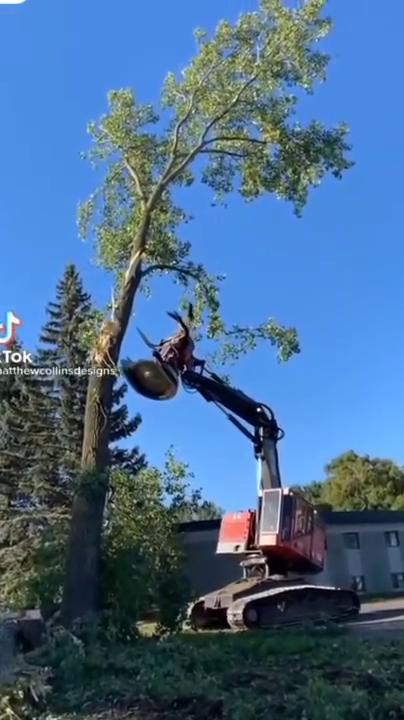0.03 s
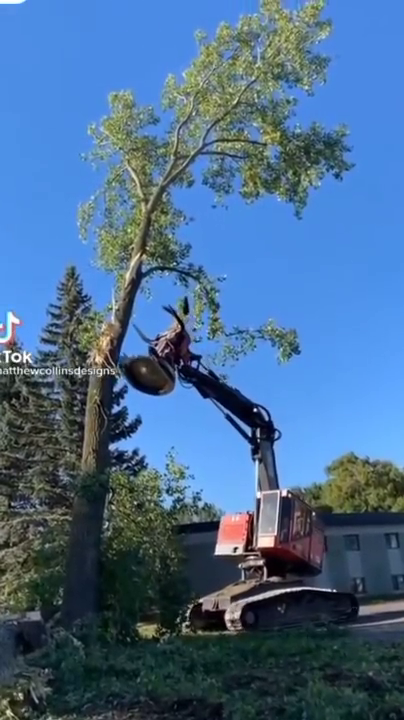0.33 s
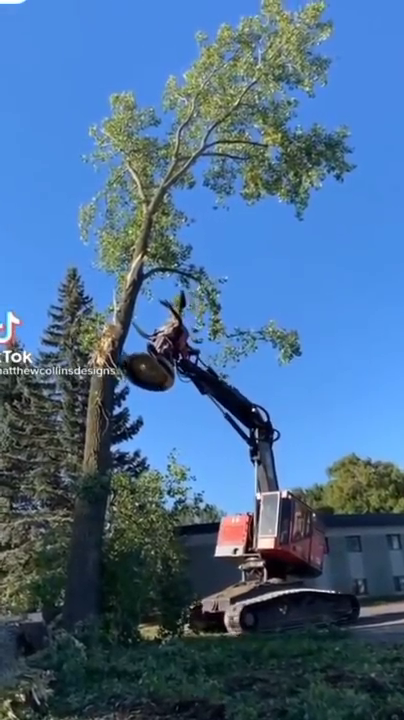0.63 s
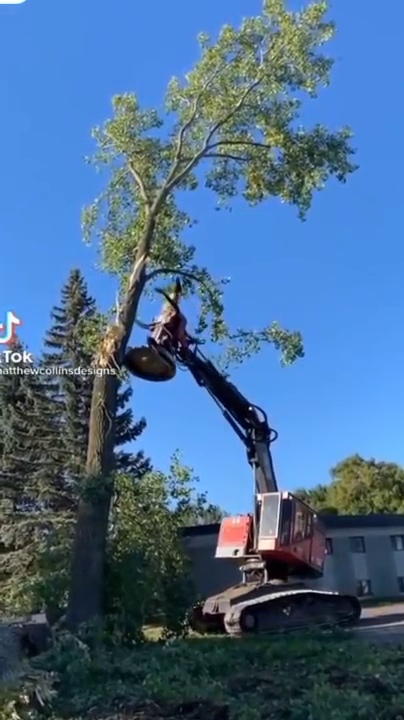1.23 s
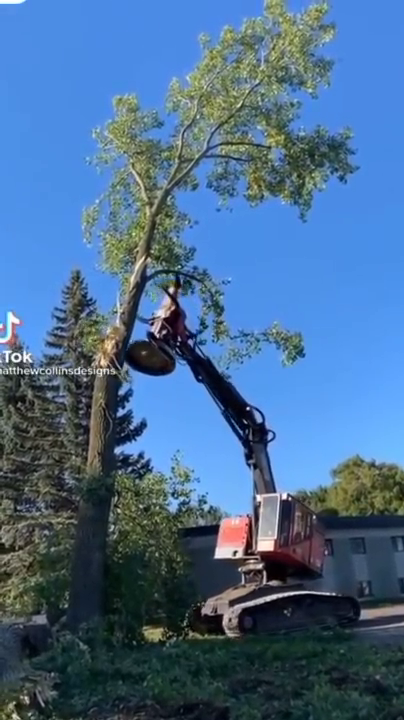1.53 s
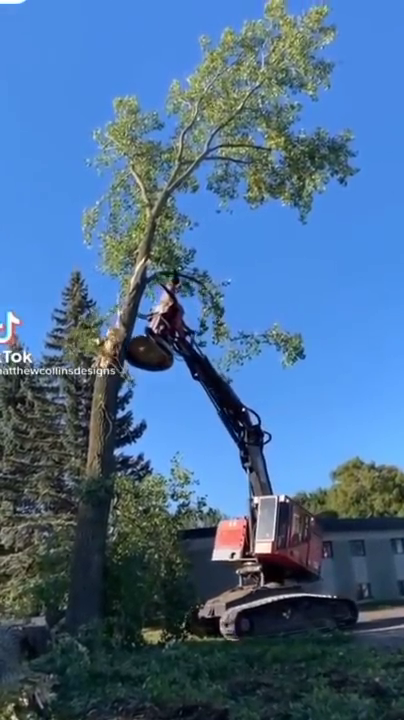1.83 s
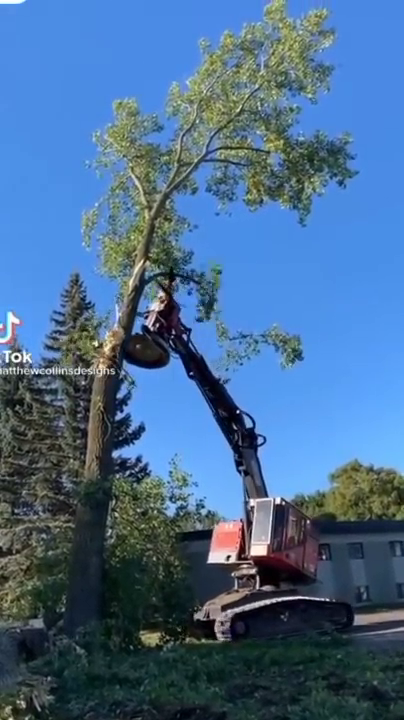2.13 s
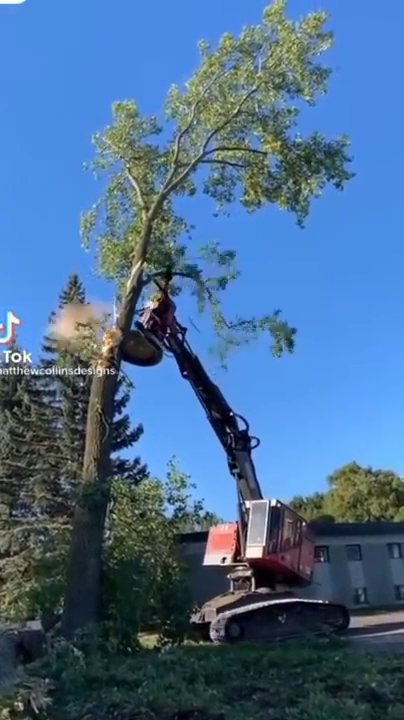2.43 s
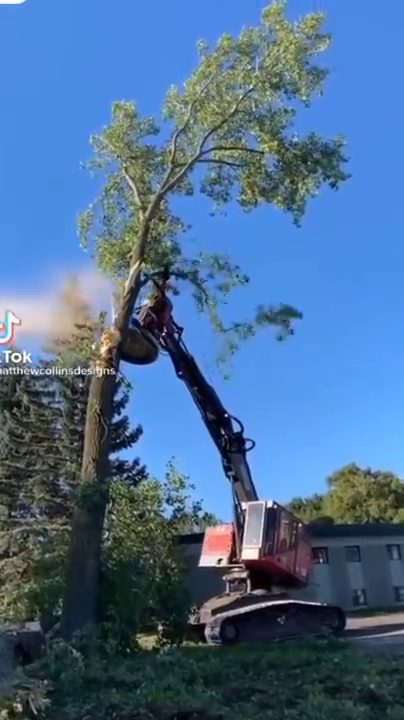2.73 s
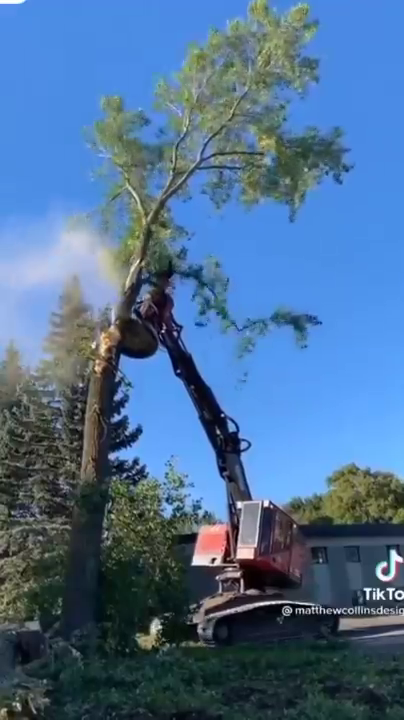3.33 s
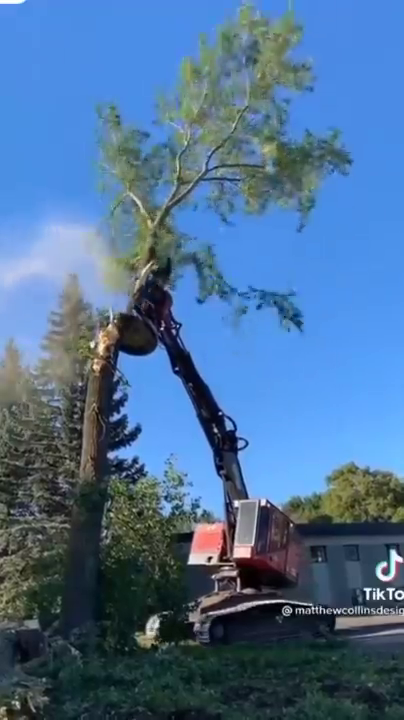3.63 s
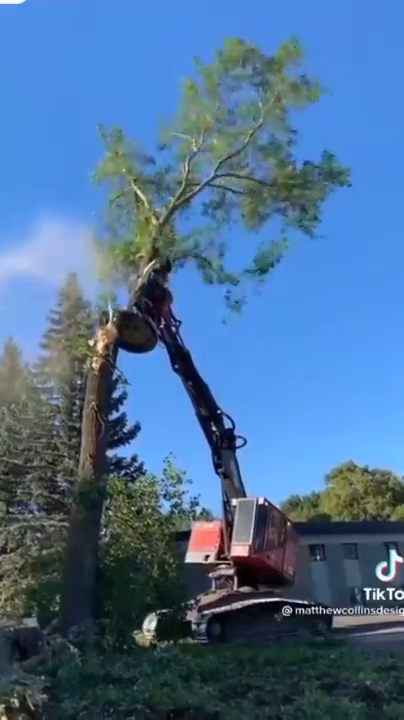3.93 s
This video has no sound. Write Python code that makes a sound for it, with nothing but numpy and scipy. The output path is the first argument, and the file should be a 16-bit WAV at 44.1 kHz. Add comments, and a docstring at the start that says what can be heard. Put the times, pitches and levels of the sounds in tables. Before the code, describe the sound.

A large saw disc whines and whirs over a tree cutter's diesel drone. It bites into a trunk with a loud rasp, slowing as it cuts, and the wood snaps. Heard nearby outdoors, with little echo.

```python
"""A yard among trees and walls, one microphone near enough to a tracked tree cutter to catch little echo.
Its diesel drones behind a free-spinning saw disc that whines and stirs the air.
The disc bites into the trunk, rasps through it tooth by tooth and loses speed, then rubs in the cut.
The last wood snaps in a short crackling burst, and the engine sags under load."""
import sys
import numpy as np
from scipy import signal
from scipy.fft import rfft, irfft
from scipy.io import wavfile
from scipy.ndimage import map_coordinates

SR = 44100
rng = np.random.default_rng(int(sys.argv[2]) if len(sys.argv) > 2 else 0)


def digitize_waveform(pressure):
    """Quantize a signal to 16-bit integers and store it at the path in sys.argv[1].

    Rows of a 2-D input are taken as channels; values are limited to [-1, 1].
    """
    field = np.atleast_2d(pressure).T
    bounded = np.clip(field, -1, 1)
    quanta = np.round(bounded * 32767).astype(np.int16)
    wavfile.write(sys.argv[1], SR, quanta)


N = 176400
T = np.arange(N) / SR
FREQS = np.arange(N // 2 + 1) * SR / N

# The disc's way through the trunk (time [s], rasp [dB], sawdust hiss [dB], tooth knocks [dB])
CUT_LEVELS = [(2.3, -100, -100, -70), (2.455, -56, -62, -45), (2.5, -35, -39, -44), (2.57, -34.5, -34, -42),
              (2.635, -29.5, -29.5, -40), (2.72, -35.5, -30, -35.5), (2.78, -32.5, -30, -39),
              (2.81, -29.5, -25.5, -38), (2.86, -32, -30, -37.5), (2.905, -28.5, -30, -34),
              (2.94, -31, -29.5, -36), (3.08, -31, -32, -33), (3.145, -26.5, -32, -32.5),
              (3.195, -34, -37, -34), (3.24, -36, -36, -35), (3.275, -52, -47, -40), (3.31, -60, -52, -37),
              (3.37, -57, -56, -40), (3.41, -50, -48, -35.5), (3.455, -52, -52, -40.5),
              (3.48, -54, -50, -37), (3.53, -56, -50, -40), (3.6, -58, -54, -48), (3.7, -80, -75, -60)]


def undb(db):
    """Decibels to gain."""
    return 10 ** (np.asarray(db) / 20)


def unit(x):
    """Scale to rms 1."""
    return x / np.sqrt(np.mean(x ** 2))


def curve(table, column=1):
    """One column of a table, joined by straight lines in time."""
    rows = np.array(table, float)
    return np.interp(T, rows[:, 0], rows[:, column])


def colour(x, points):
    """Filter by (frequency [Hz], relative level [dB]) points; rms 1."""
    hz, db = np.array(points, float).T
    gain = undb(np.interp(np.log(np.maximum(FREQS, 1)), np.log(hz), db))
    return unit(irfft(rfft(x) * gain, N))


def drift(rate_hz):
    """Smooth random drift with spread 1."""
    lowpass = np.exp(-(FREQS / rate_hz) ** 2) * (FREQS > 0)
    return unit(irfft(rfft(rng.standard_normal(N)) * lowpass, N))


def patchy(x, depth_db, width_hz=170, rate_hz=12, top_hz=15350):
    """Narrow bands swell and fade on their own; rms 1."""
    spectrum = rfft(x)
    bands = (irfft(spectrum * np.maximum(1 - abs(FREQS / width_hz - k), 0), N)
             for k in range(int(top_hz / width_hz) + 1))
    return unit(sum(band * undb(depth_db * drift(rate_hz)) for band in bands))


def load(full_bite_db=-31):
    """How hard the teeth bite, from 0 (spinning free) to 1."""
    return np.minimum(undb(curve(CUT_LEVELS) - full_bite_db), 1)


def fibres(snaps_per_s=1800, snap_share=.6):
    """Wood fibres giving way: dense snaps over a hiss."""
    snaps = (rng.random(N) < snaps_per_s / SR) * rng.choice([-1, 1], N)
    return np.sqrt(snap_share) * unit(snaps) + np.sqrt(1 - snap_share) * rng.standard_normal(N)


def yard(direct, echo_db=-19, t60_s=.3):
    """Faint, dull scatter from trees and walls follows the direct sound to the microphone."""
    tail = colour(rng.standard_normal(N), [(1000, 16), (10000, -24)]) * undb(-60 * T / t60_s)
    return direct + undb(echo_db) * signal.fftconvolve(direct, tail / np.linalg.norm(tail))[:N]


def engine(cylinders=6, waver_db=1.5):
    """The diesel's cylinders fire in turn; their unevenness adds orders around the firing note."""
    # Firing note, sagging under load (time [s], firing rate [Hz], level [dB])
    firing = [(0, 89.4, -46), (2.6, 90.54, -47), (2.78, 89.5, -45.5), (2.95, 92.1, -50), (3.2, 90.6, -45.5),
              (3.35, 82.5, -41.5), (3.48, 74.6, -44), (3.6, 73.6, -34), (3.71, 70.6, -41.5),
              (3.85, 73.6, -35), (4, 73.65, -37)]
    # Exhaust orders (multiple of the engine cycle, relative level [dB])
    orders = [(6, 0.5), (8, -15), (12, -9), (15, -8.5), (24, -14.5)]
    cycles = np.cumsum(curve(firing)) / SR / cylinders
    drone = sum(undb(db + waver_db * drift(10)) * np.sin(2 * np.pi * (k * cycles + rng.random()))
                for k, db in orders)
    return np.sqrt(2) * drone * undb(curve(firing, 2))


def rush(speed, air_db=-37.5, roar_db=-31):
    """Stirred air and a hollow roar; both sink as the disc slows from full speed (1)."""
    # Air and machinery (frequency [Hz], relative level [dB])
    air_spectrum = [(30, -16), (60, 2), (300, -12.5), (355, 1), (390, -3.5), (480, 0), (620, 2), (760, -3),
                    (900, -11.5), (1000, -1.5), (1150, -8), (1400, -10), (1600, -9), (2000, -13.5),
                    (2450, -16.5), (2600, -12.5), (3100, -17.5), (4000, -20), (5500, -23.5), (7200, -20),
                    (8200, -30), (10000, -25.5), (11800, -26), (12400, -82), (14200, -35), (14800, -70)]
    # The machine's roar at full speed (frequency [Hz], relative level [dB])
    roar_spectrum = [(25, -53), (42, -41), (62, -22.5), (80, -22), (108, -25), (150, -18.5), (178, -8),
                     (200, 3), (226, -4.5), (262, -5), (300, -13.5), (350, -41.5), (600, -76)]
    air = colour(rng.standard_normal(N), air_spectrum) * undb(air_db + .5 * drift(3.5))
    roar = colour(rng.standard_normal(N), roar_spectrum)
    roar = map_coordinates(roar, [np.cumsum(speed ** .5)], order=1, mode="mirror")  # pitch sinks too
    return air * speed ** 2.1 + roar * undb(roar_db) * speed ** 1.95


def disc_ring(width_hz=24, idle_db=-61, against_rasp_db=-7):
    """The steel disc sings faintly while it spins free, and loudly while it rasps through wood."""
    # Ringing modes of the disc (frequency [Hz], relative level [dB])
    modes = [(1010, -6), (1620, -3), (2580, -8), (2838, 0), (3030, 0), (3340, -2), (3485, -1), (3610, -5),
             (7280, -5)]
    response = sum(undb(db) / (1 + 2j * (FREQS - hz) / width_hz) for hz, db in modes)
    drive = rng.standard_normal(N) * (undb(idle_db) + undb(against_rasp_db + curve(CUT_LEVELS)))
    return irfft(rfft(drive) * response / np.sqrt(np.mean(abs(response) ** 2)), N)


def whine(teeth, speed, shudder_cycles=.02, shudder_db=1.3, shudder_hz=40):
    """The tooth-passing tone with its wavering overtones; it shudders under load."""
    # Whine at the microphone (time [s], fundamental [dB], octave [dB])
    levels = [(0, -33.5, -33.5), (.5, -32.5, -35.5), (.98, -32, -35.5), (1.13, -32, -41.5),
              (1.43, -31.5, -43), (1.52, -32.5, -39.5), (1.7, -33.5, -39), (2.1, -33, -34),
              (2.45, -35.5, -32.5), (2.54, -39, -35.5), (2.6, -37, -30.5), (2.68, -40, -28),
              (2.75, -36.5, -29.5), (2.8, -33.5, -47), (2.84, -30, -44), (2.885, -34.5, -31),
              (2.97, -37, -30.5), (3.01, -34.5, -41), (3.045, -31, -31), (3.1, -28, -25.5),
              (3.15, -24.5, -30), (3.22, -31, -25.5), (3.25, -36, -39), (3.32, -29, -40.5),
              (3.39, -35.5, -48), (3.42, -34, -34.5), (3.49, -35, -35.5), (3.56, -32.5, -35),
              (3.68, -40, -51), (4, -37.5, -44)]
    # Overtones at full speed (multiple of the tooth rate, level [dB])
    overtones = [(3, -59.5), (4, -57.5), (5, -56), (6, -64)]
    phase = teeth + shudder_cycles * load() * drift(shudder_hz)
    tone = lambda k: np.sqrt(2) * np.sin(2 * np.pi * (k * phase + rng.random()))
    waver_db = lambda: .8 * drift(48) + shudder_db * load() * drift(shudder_hz)
    low = sum(tone(k) * undb(curve(levels, k) + waver_db()) for k in (1, 2))
    high = sum(tone(k) * undb(db + 6.5 * drift(3.1)) for k, db in overtones)
    return low + high * speed ** 2


def cut(teeth, rub_jitter_cycles=.007, bite_jitter_cycles=.016, scatter_db=2.1, likeness=.45):
    """Each tooth knocks the wood and tears out a puff of fibres; mere rubbing buzzes more evenly."""
    # Disc and trunk struck by the teeth (frequency [Hz], relative level [dB])
    knock_spectrum = [(300, -40), (560, -16), (750, -5), (890, -17), (1030, 0), (1280, -5), (1560, -1.5),
                      (1800, -6), (2050, -5), (2350, -13), (2570, -14), (2820, -10), (3090, -16),
                      (3350, -11), (3850, -17), (6000, -23), (11000, -34), (13000, -60)]
    # Tearing fibres (frequency [Hz], relative level [dB])
    rasp_spectrum = [(50, -20), (130, 12), (300, 1), (600, 0), (900, -10), (1300, -11), (1620, -1.5),
                     (1850, -2), (2450, -3), (2900, 2.5), (3200, 3), (3500, 3), (4300, -3.5), (5200, -39),
                     (9000, -67)]
    # Hiss of flying sawdust (frequency [Hz], relative level [dB])
    sawdust_spectrum = [(2500, -64), (4300, -14), (5300, -4), (6400, 2), (7350, 3), (8000, -4),
                        (9500, -7.5), (10500, 2), (11800, -7), (12300, -14), (15000, -33)]
    phase = teeth + (rub_jitter_cycles + bite_jitter_cycles * load()) * drift(150) + 1
    tooth = np.floor(phase).astype(int)
    bite = undb(scatter_db * load() * rng.standard_normal(N // 100)[tooth])  # one strength per tooth
    strikes = np.diff(tooth, prepend=tooth[0]) * bite
    knocks = colour(patchy(strikes, depth_db=3.2), knock_spectrum) * undb(curve(CUT_LEVELS, 3))
    puffs = fibres() * np.exp(.5 * np.cos(2 * np.pi * phase)) * bite * undb(.8 * drift(20))
    # Each puff partly repeats those of the three teeth before it.
    puffs = sum(likeness ** k * np.interp(teeth - k, teeth, puffs) for k in range(4))
    puffs = patchy(puffs, depth_db=2.8)
    rasp = colour(puffs, rasp_spectrum) * undb(curve(CUT_LEVELS))
    sawdust = colour(puffs, sawdust_spectrum) * undb(curve(CUT_LEVELS, 2))
    return rasp + sawdust + knocks


def burst(at_s, rise_s, decay_s):
    """Exponential rise and fall around a moment."""
    return np.exp(-np.maximum((at_s - T) / rise_s, (T - at_s) / decay_s))


def cracks(body_below_hz=4300, thud_db=-31):
    """Twigs tick thinly, thicker splinters break with more body and the trunk parts with a thud."""
    # Wood breaking (time [s], level [dB], rise [s], decay [s], body gain [dB])
    breaks = [(1.78, -40, .001, .005, -12), (2.158, -35.5, .0012, .003, -10), (2.2, -46, .025, .017, -10),
              (2.227, -31.5, .00056, .0029, -10), (2.632, -31, .004, .009, -1),
              (2.898, -20, .00083, .0018, 0), (2.909, -21.5, .001, .0036, 0), (3.539, -30, .0004, .0015, 0),
              (3.547, -28, .003, .006, -2), (3.5588, -16, .002, .004, 1.5), (3.563, -20.5, .0006, .005, 0),
              (3.571, -29, .001, .004, -2)]
    # Snapping wood (frequency [Hz], relative level [dB])
    snap_spectrum = [(50, -20), (150, -7), (500, 8), (1300, 9), (2200, 9), (3000, 13), (4000, 7), (6000, 7),
                     (7500, 8), (10500, 5), (12000, 1), (13000, -13), (15000, -34)]
    # The parting trunk (frequency [Hz], relative level [dB])
    thud_spectrum = [(50, -20), (170, -6), (300, -11), (500, -6), (900, -26), (2000, -79)]
    snap = colour(fibres(), snap_spectrum)
    body = signal.sosfiltfilt(signal.butter(4, body_below_hz, fs=SR, output="sos"), snap)
    edge = snap - body
    splinters = sum((edge + undb(body_db) * body) * undb(db) * burst(at, rise, decay)
                    for at, db, rise, decay, body_db in breaks)
    thud = colour(rng.standard_normal(N), thud_spectrum) * undb(thud_db)
    return splinters + thud * burst(at_s=3.564, rise_s=.007, decay_s=.009)


def scene():
    """The cutter in mono from one spot; the disc's speed drives the whine, the rush and the cut."""
    # The disc slowing in the trunk (time [s], tooth-passing rate [Hz])
    tooth_rate = [(0, 316.7), (2.5, 317.1), (2.67, 312.5), (2.83, 303.3), (3.0, 289.8), (3.1, 280.3),
                  (3.23, 265.5), (3.32, 259.3), (3.46, 254.6), (3.58, 250.5), (3.7, 246), (4, 244)]
    tooth_hz = curve(tooth_rate)
    teeth = np.cumsum(tooth_hz * (1 + .00067 * drift(5.8))) / SR  # count of teeth passed
    speed = tooth_hz / tooth_hz[0]
    machine = whine(teeth, speed) + rush(speed) + engine()
    felling = cut(teeth) + disc_ring() + cracks()
    return (machine + yard(felling))[None]


def record(dry, notch_db=-31.5, top_hz=15350):
    """The microphone's signal loses two narrow treble bands throughout, and the top is cut."""
    notch = lambda hz, half_width_hz: np.exp(-((FREQS - hz) / half_width_hz) ** 4)
    gain = undb(notch_db * (notch(4680, 413) + notch(8820, 440)))
    notched = irfft(rfft(dry) * gain, N)
    return signal.sosfilt(signal.ellip(8, .2, 70, top_hz, fs=SR, output="sos"), notched)


dry = scene()
out = record(dry)
digitize_waveform(out)
```